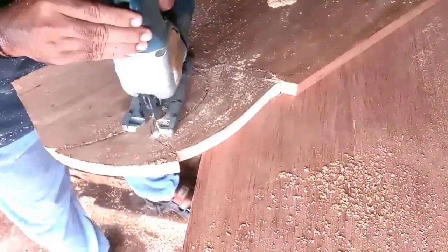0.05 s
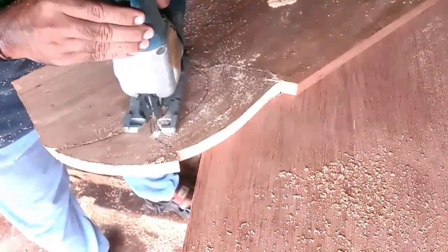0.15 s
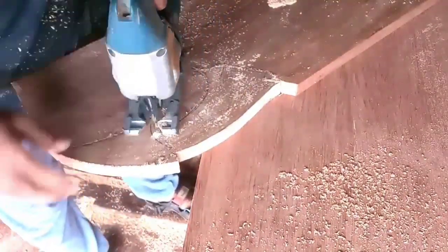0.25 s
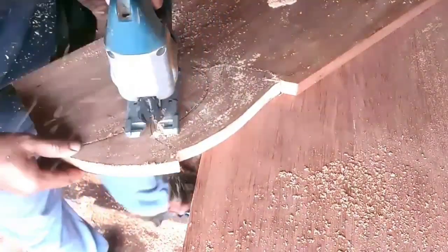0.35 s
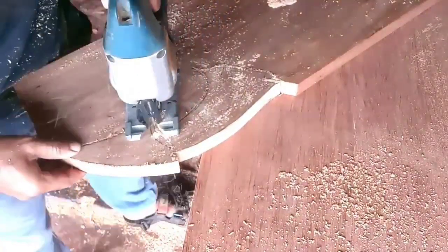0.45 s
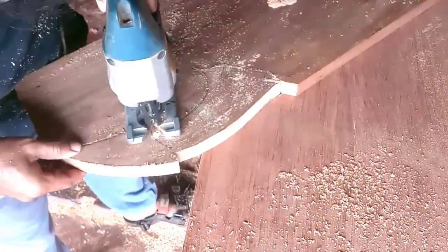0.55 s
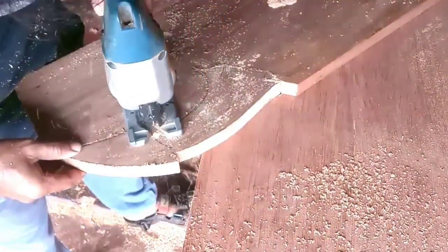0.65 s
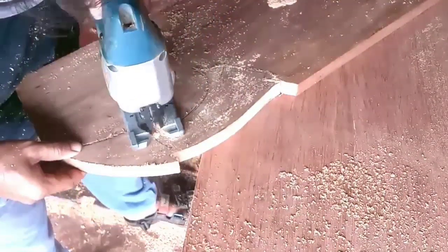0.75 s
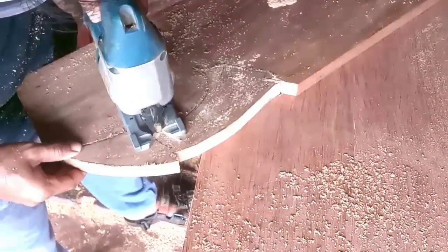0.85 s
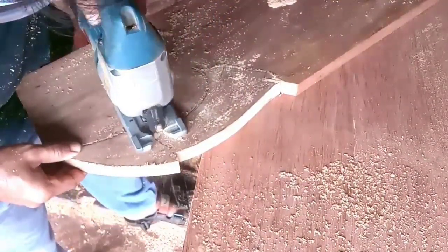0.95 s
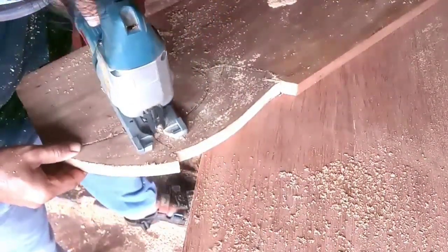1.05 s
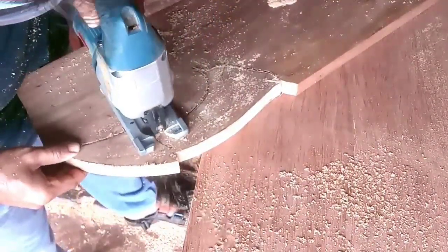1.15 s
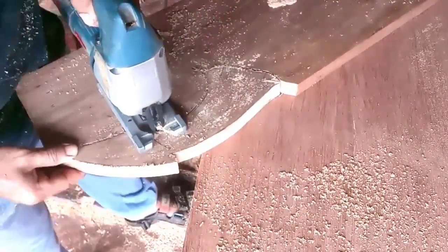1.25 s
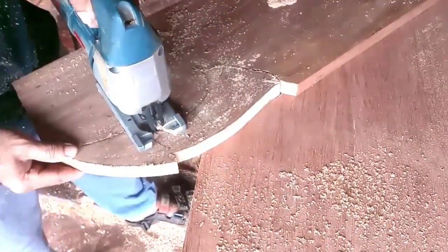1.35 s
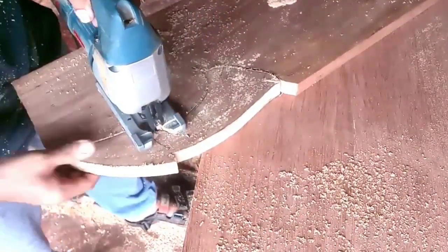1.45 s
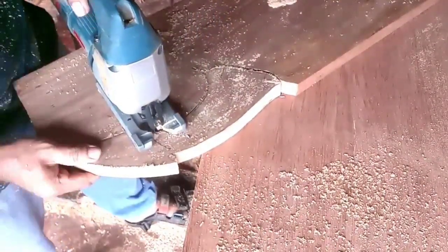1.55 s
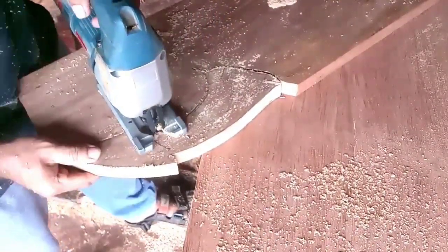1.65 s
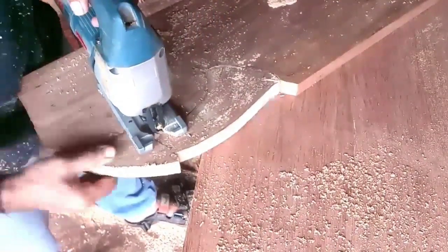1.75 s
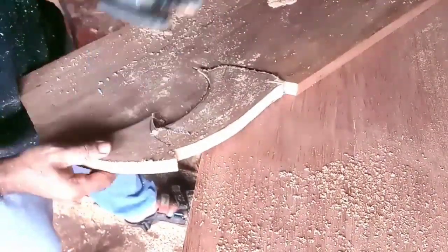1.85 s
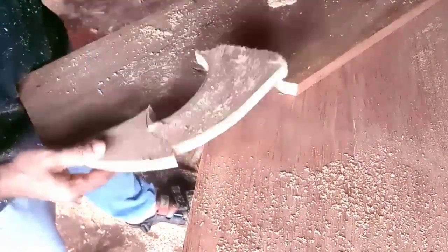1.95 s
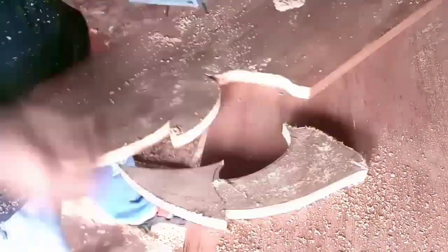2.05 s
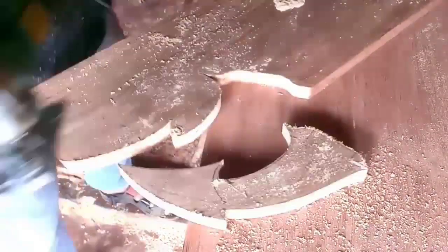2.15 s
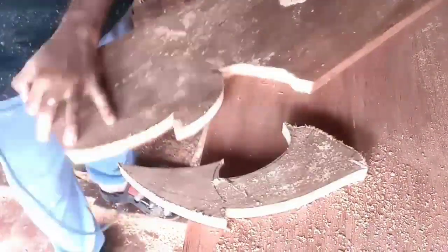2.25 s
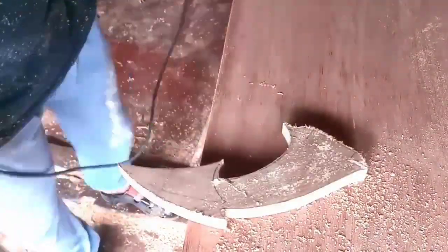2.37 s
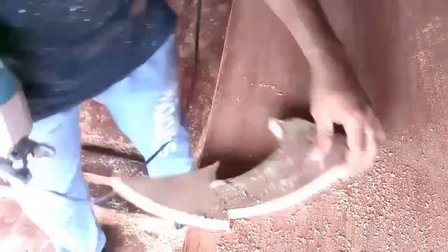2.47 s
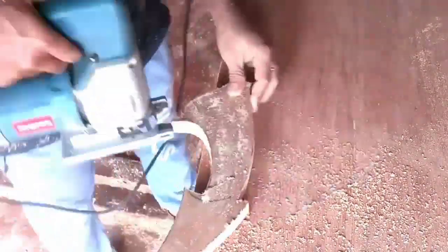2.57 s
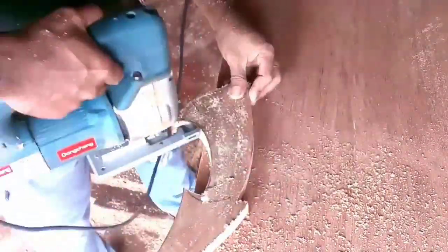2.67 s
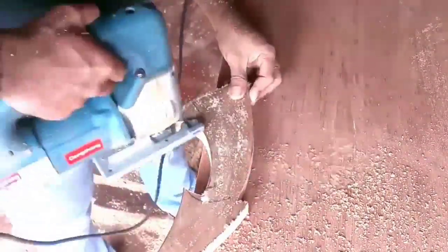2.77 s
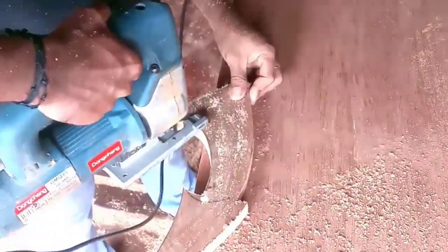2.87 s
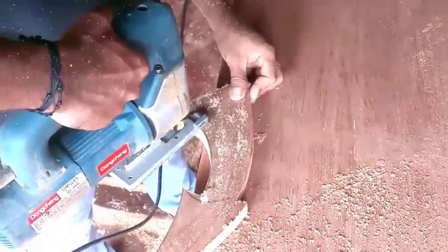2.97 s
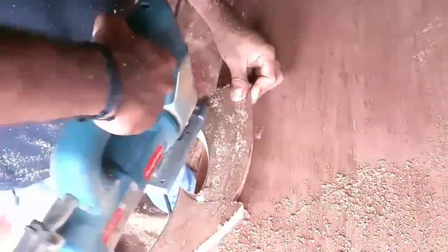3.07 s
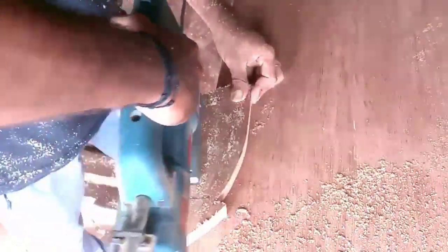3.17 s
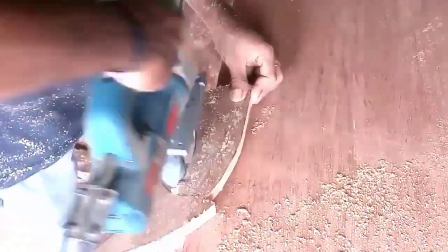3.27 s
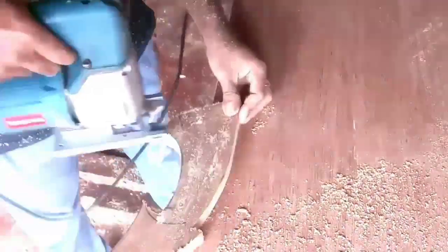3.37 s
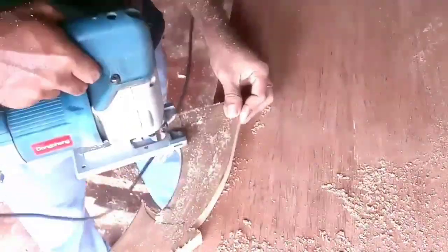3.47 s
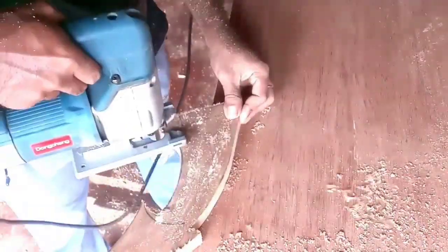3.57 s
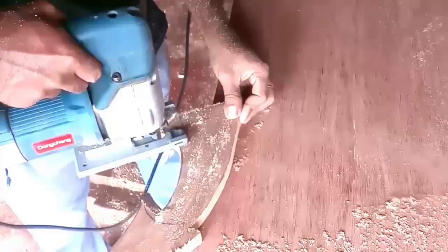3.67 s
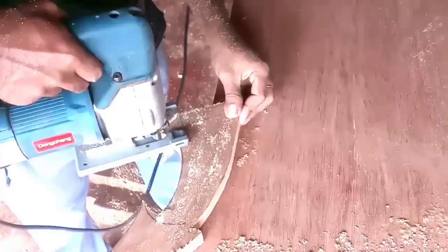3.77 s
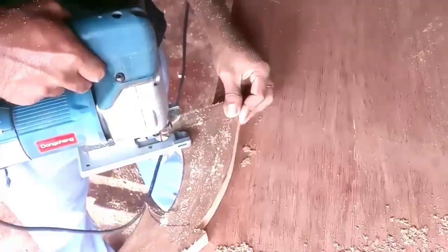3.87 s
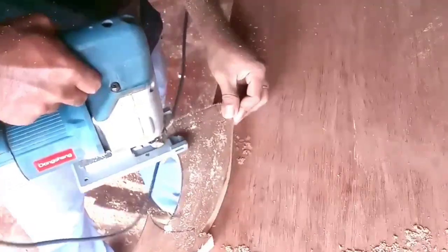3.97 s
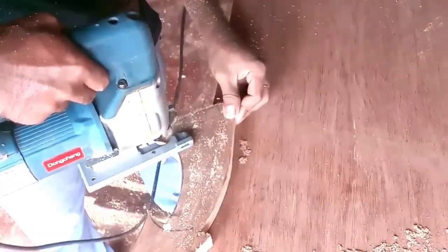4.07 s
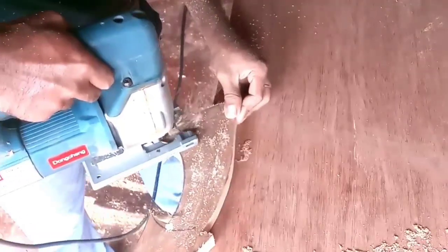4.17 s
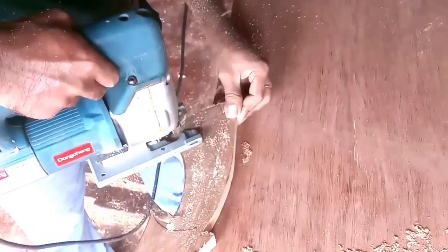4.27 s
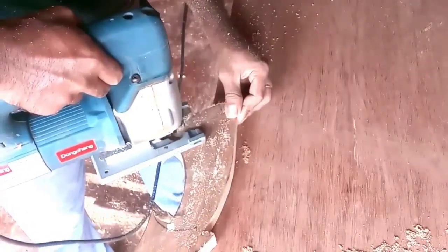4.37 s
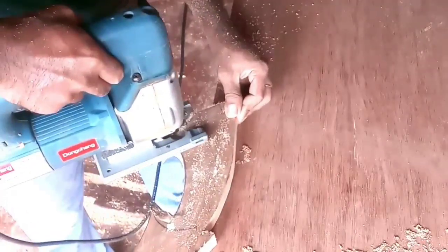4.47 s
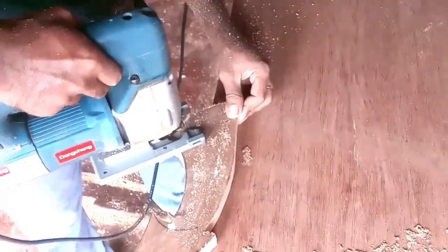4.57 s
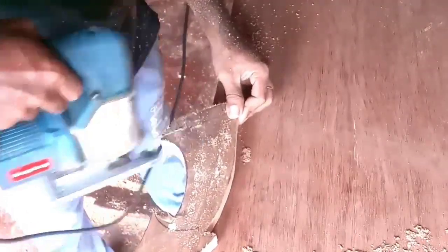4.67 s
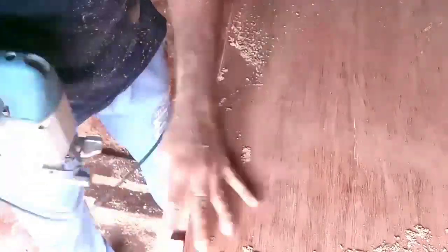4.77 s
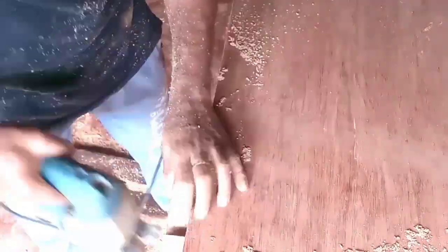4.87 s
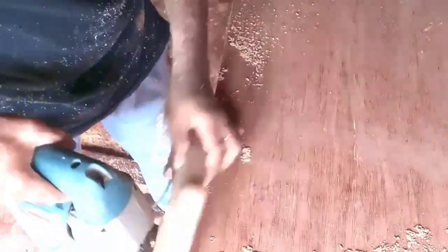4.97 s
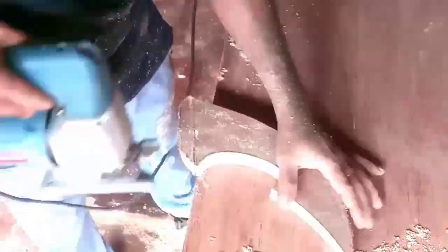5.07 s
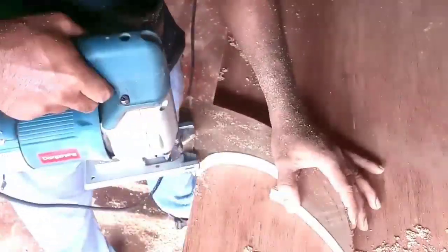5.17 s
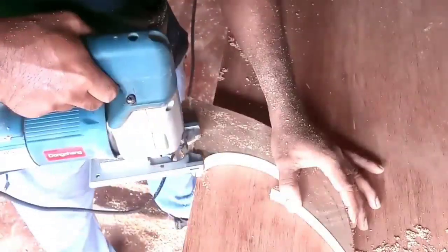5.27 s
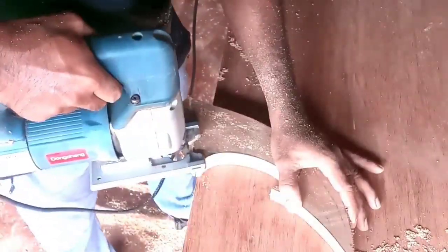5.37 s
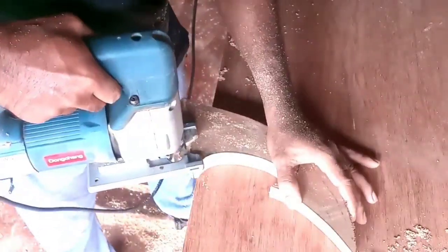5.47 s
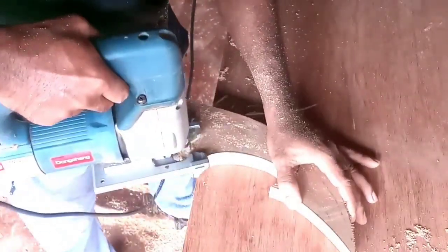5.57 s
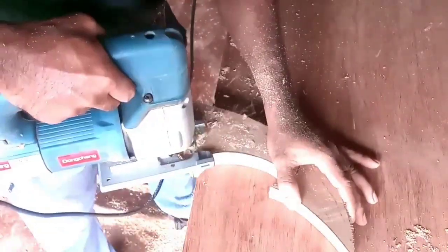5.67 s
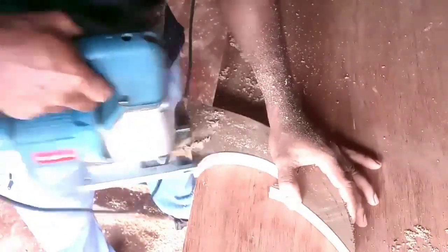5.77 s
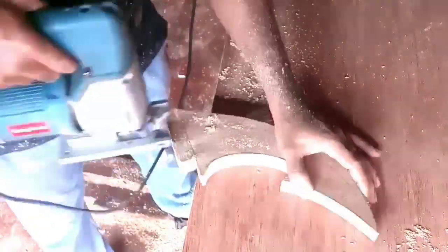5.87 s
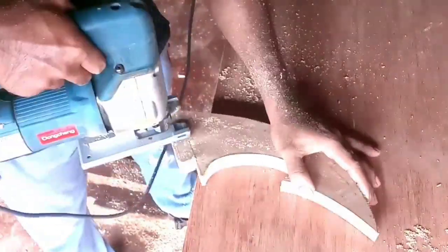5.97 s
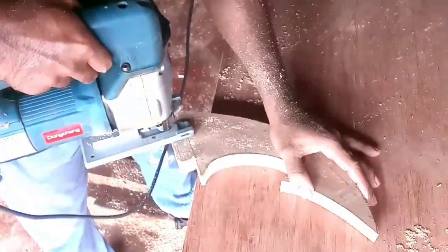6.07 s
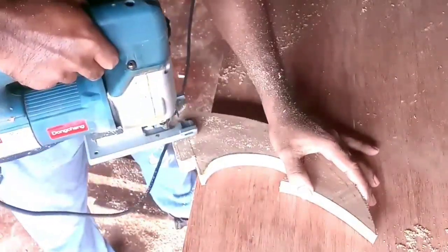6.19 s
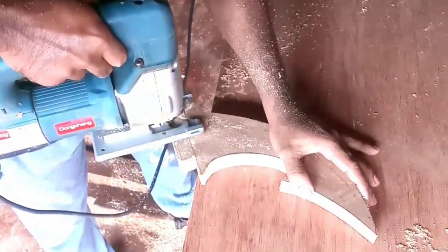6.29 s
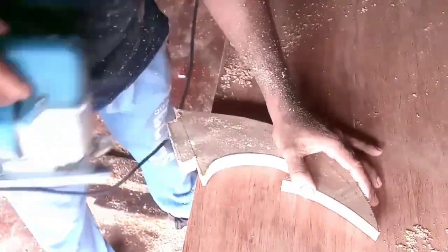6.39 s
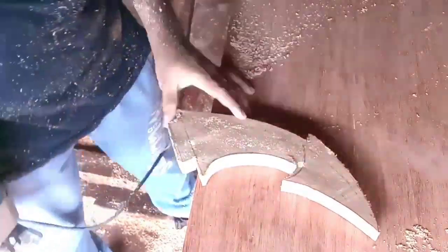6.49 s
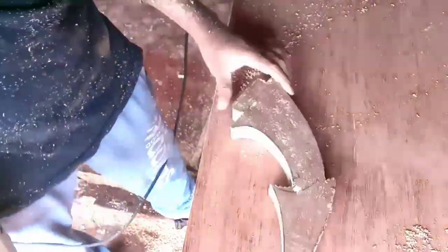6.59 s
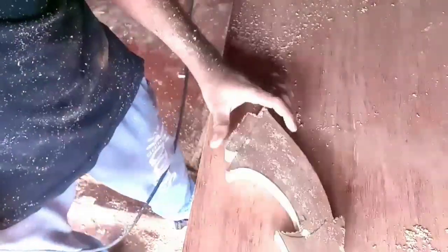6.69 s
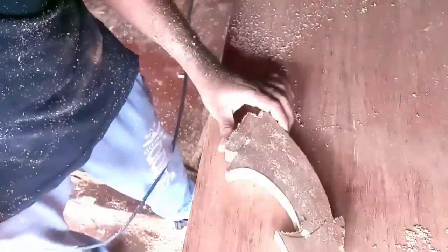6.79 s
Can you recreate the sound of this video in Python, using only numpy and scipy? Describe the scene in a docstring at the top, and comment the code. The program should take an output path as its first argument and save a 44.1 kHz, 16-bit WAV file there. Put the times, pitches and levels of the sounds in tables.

```python
"""Jigsaw in time lapse

A hand-held jigsaw cuts a board in several runs: gritty bursts, one per stroke, drive resonances of the saw
and the wood. Short snatches are cross-faded, so the strokes lose their beat and the whirr turns grainy.
Loose parts rattle, the board hums as a drifting resonance, and the bench rumbles as deep filtered noise.
Mostly in the pause, the offcut knocks as decaying modes, is dragged, and a hand sweeps dust as ticking hiss.
"""
import sys
import numpy as np
from scipy import signal
from scipy.fft import rfft, irfft
from scipy.io import wavfile
from scipy.ndimage import uniform_filter1d

SR = 44100
rng = np.random.default_rng(int(sys.argv[2]) if len(sys.argv) > 2 else 0)


def to_wav(sig):
    """Store sig (one row per channel, or 1-D mono) as 16-bit WAV at the path in sys.argv[1].

    Samples outside -1..1 are clipped; the rate is SR.
    """
    pcm = np.clip(np.atleast_2d(sig), -1, 1) * 32767
    pcm = np.round(pcm).astype(np.int16)
    wavfile.write(sys.argv[1], SR, pcm.T)  # frames by channels


N = 301203

# Trigger squeezes: (press [s], run-up [s], release [s], run-down [s], base whirr level [dB])
TRIGGER_SQUEEZES = [(-0.1, .02, 1.3, .56, -34.2), (2.752, .01, 2.77, .3, -57), (2.78, .02, 2.817, .42, -33),
                    (2.89, .12, 3.39, .75, -34.5), (3.5, .2, 4.8, .62, -34.8),
                    (5.3, .022, 5.86, .62, -34.8), (6.08, .03, 6.48, .6, -34.6)]
# Coasting motor: (share of run-down [0-1], level change [dB])
RUN_DOWN_CURVE = [(0, 0), (.3, -5), (.55, -9), (.65, -12.5), (.8, -22), (1, -40)]
# Slow strokes heard singly: (time [s], swell [dB])
COASTING_STROKES = [(1.447, 2.5), (1.5, 3), (1.558, 4), (1.604, 3), (1.644, 7), (1.68, 3), (1.729, 4.5),
                    (1.772, 5.5), (1.8, 6), (5.11, 5.5), (5.137, 4.5), (5.165, 0), (5.185, 3.5), (5.22, 5),
                    (5.252, 4), (5.3, 7), (6.744, 4), (6.764, 5)]
# Colour as the saw is turned and pressed: (time [s], added whirr [dB], then relative to whirr:
# low shell ring [dB], high shell ring [dB], tooth bite [dB], wood drone [dB])
GRIP_COLOUR = [(0, .1, -4.5, -2.5, -4.5, -8), (.45, -.1, -3.5, -1, -3, -8), (.9, -.1, -5, -2.5, -4, -7.5),
               (1.3, .1, -7, -6.5, -4.5, -9), (1.6, .2, -7, -6, -4.5, -9), (1.72, -.1, -6, -2.5, -.5, -.6),
               (2.77, .1, -1, -5, 9, 4), (2.805, .1, -2, -5, -3.5, -9), (2.93, -.1, .3, -2.5, -.2, -4.5),
               (3.05, .1, -3.5, -.3, -1.5, -8.5), (3.22, -.1, -.3, -4.2, -.1, -8.6),
               (3.39, .1, -1, -2.5, .2, -10), (3.55, -.1, .3, -2.5, -4, -7), (3.8, .1, .9, -2.8, -5, -7.5),
               (4.4, -.1, .1, -2.3, -3, -7), (4.75, .1, -.3, -2, -3, -9), (4.88, -.8, 2, -.8, -7.5, -9),
               (5.0, -4, -1, -1.5, -3.5, -10), (5.12, .5, -4, -7, -7, -8.5), (5.27, 2.4, -.5, .8, -2, -1.2),
               (5.34, .1, .1, -2.5, -4.2, -7), (5.75, -.1, .7, .2, -4.8, -7.6),
               (5.97, .3, -1, -2.5, -5, -10), (6.1, .1, -1, -2.5, -4.5, -7),
               (6.45, .1, -.5, -2, -3.5, -7.5), (6.6, -2.4, -.5, -.5, -3, -9),
               (6.72, -3.2, -4, -2.5, -4.5, -9), (6.8, 1.2, -4.5, -3, -4.5, -7)]
# Fan and gear spectrum: (frequency [Hz], gain [dB])
WHIRR_SPECTRUM = [(2300, -75), (3600, -13), (4000, -0.5), (4500, 3), (5900, 0.9), (6500, 3), (6900, -0.2),
                  (8200, 1.5), (8600, -2.5), (9600, -14), (10200, -12), (14700, -15), (15300, -13.5),
                  (15600, -18)]
# Shell modes, lower group: (frequency [Hz], width [Hz], level [dB])
SHELL_LOW_MODES = [(2870, 540, -4), (3155, 410, -0.5)]
# Shell modes, upper group: (frequency [Hz], width [Hz], level [dB])
SHELL_HIGH_MODES = [(3497, 410, 0.5), (3920, 850, -6)]
# Tooth bite spectrum: (frequency [Hz], gain [dB])
BITE_SPECTRUM = [(900, -15), (1400, -14.5), (1900, -9), (2400, -7.5), (2900, -13.5), (4500, -19.5)]
# Wood drone spectrum: (frequency [Hz], gain [dB])
DRONE_SPECTRUM = [(280, -19), (480, -3), (633, -4), (706, 1.5), (847, -1.5), (981, 1.5), (1220, -2.5),
                  (1500, -3.5), (1950, -20), (3300, -120)]
# Single rattles of blade and gears: (time [s], peak before input stage [dB], pitch [Hz])
RATTLE_EVENTS = [(0.6922, -21, 3660), (1.4184, -26, 5630), (1.444, -26, 4420), (1.477, -24.5, 5440),
                 (1.5114, -25, 4930), (1.638, -30, 2963), (1.724, -36.5, 3190), (1.7648, -42, 4280),
                 (1.8367, -46, 7000), (2.758, -36.5, 8300), (2.973, -22, 3500), (3.0314, -24, 3440),
                 (3.1254, -18, 3200), (3.3563, -23, 3100), (3.684, -23, 3470), (3.736, -21, 3130),
                 (3.7862, -20, 3030), (4.0022, -20, 3100), (4.3325, -22, 3040), (4.9336, -25, 3300),
                 (5.0885, -29, 3180), (5.1097, -28, 2790), (5.213, -26, 3180), (5.2949, -31, 3070),
                 (5.328, -24, 3400), (5.344, -18, 3200), (5.698, -20, 3250), (5.831, -19, 3320),
                 (5.9024, -20, 3270), (6.5386, -21, 3520), (6.789, -28, 6650)]
# Board hums under blade or hand: (start [s], end [s], first level [dB], last level [dB], nominal centre [Hz])
BOARD_HUMS = [(-0.05, 1.35, -52.5, -54, 275), (1.4, 1.75, -64, -63, 205), (1.9, 2.12, -52.5, -56, 220),
              (2.16, 2.32, -52, -46, 185), (2.4, 2.8, -60, -59, 215), (2.88, 3.36, -58, -47, 272),
              (3.58, 4.08, -50.5, -47.5, 265), (4.12, 4.2, -48, -45, 183), (4.24, 4.76, -45.5, -46.5, 265),
              (5.34, 5.85, -47.5, -48, 298), (6.08, 6.44, -47.5, -42, 291), (6.77, 6.897, -58, -63, 240)]
# Offcut blows: (time [s], ring peak [dB], sharpness [dB per octave])
KNOCK_EVENTS = [(1.841, -43, -4), (1.934, -39, -5), (2.0026, -23, -0.7), (2.1122, -25.5, -5.5),
                (2.1215, -35, -3), (4.016, -27, 0.5), (5.136, -31.5, -5.5), (6.762, -43, -8)]
# Offcut modes: (frequency [Hz], level [dB], t60 [s])
OFFCUT_MODES = [(145, 5, 0.027), (328, 2, 0.03), (463, -5, 0.06), (592, -7, 0.047), (814, 0.5, 0.026),
                (1230, -3, 0.017), (1560, -10, .015), (2120, -1.5, 0.0094), (2850, -13, 0.011),
                (3600, -19, .01)]
# Wood and hand on the dusty bench: (time [s], level [dB], added treble gain [dB])
SLIDE_LEVELS = [(1.75, -57.5, 0), (1.85, -58.5, -4), (2.1, -56.5, -1.5), (2.18, -53.5, -1.5),
                (2.376, -54.5, -2.5), (2.43, -44.5, -0.5), (2.472, -52, 2), (2.488, -58, -2.5),
                (2.57, -60, -4), (2.585, -58, 3), (2.63, -57.5, -3), (2.742, -55, -8), (2.8, -56, 5)]
# Sliding spectrum: (frequency [Hz], gain [dB])
SLIDE_SPECTRUM = [(210, -27), (350, -1), (554, -2.5), (629, -13), (681, -1), (877, -8.5), (1010, -4),
                  (1880, -11), (2000, -9.5), (3320, -15), (4420, -18), (5690, -22.5), (7690, -20),
                  (9450, -38.5), (15400, -38)]
# Offcut scraping along the bench: (time [s], level [dB])
DRAG_LEVELS = [(2.14, -71), (2.222, -53), (2.242, -61), (2.256, -58), (2.304, -54), (2.384, -58),
               (2.4, -60)]
# Upper modes of the dragged offcut: (frequency [Hz], width [Hz], level [dB])
DRAG_MODES = [(1240, 330, 5), (2600, 300, -3), (3860, 400, -15)]
# Deep bench rumble: (time [s], level [dB])
BENCH_LEVELS = [(0.0, -55), (0.89, -56), (1.03, -62), (1.67, -59), (2.2, -52), (2.6, -55), (2.8, -57),
                (3.0, -63), (3.61, -63.5), (3.76, -58), (4.13, -64), (4.43, -60), (4.64, -78), (5.08, -71),
                (5.2, -68), (5.33, -61), (5.67, -70), (5.86, -61), (6.2, -64), (6.31, -58), (6.45, -74),
                (6.83, -73)]
# Bench spectrum: (frequency [Hz], gain [dB])
BENCH_SPECTRUM = [(12, -45), (25, -26), (50, -11), (90, -7), (150, -7), (210, -7.5), (350, -70)]

STROKES_PER_S, SWELL_HALF_S = 48, 0.0049
RUN_UP_POWER = 1.44  # sound pressure grows as this power of motor speed
# RMS chance waver of the GRIP_COLOUR level columns
GRIP_WAVER_DB, GRIP_CHANGES_PER_S = [.25, .7, .7, .6, .6], 12
SNATCH_SAMPLES = 256  # splice to splice
RATTLE_T60_S, CLATTER_RATIO = 0.014, .4  # clatter relative to the pitched part
HUM_RISE_DB_PER_S, HUM_FALL_DB_PER_S, HUM_REST_DB = 500, 400, -70.5
HUM_LUMPS_DB, HUM_DRIFT_RATIO, HUM_CHANGES_PER_S = 1.1, .08, 20
BAND_EDGE_HZ = 15520


def saw():
    """A gritty drive, a burst at each stroke, shakes fan and gears, shell, teeth and wood."""
    stroke_phase = np.arange(N) * STROKES_PER_S / SR % 1
    tick_shares = [[.12], [.3], [.3], [.15], [.08]]  # the shell takes the ticks most directly
    drives = grit(per_s=350, spread_db=2.0, share=tick_shares, count=5)
    drives = drives * (2.3 + np.exp(-stroke_phase / 0.29))
    bodies = [response(WHIRR_SPECTRUM), ringing(SHELL_LOW_MODES), ringing(SHELL_HIGH_MODES),
              response(BITE_SPECTRUM), response(DRONE_SPECTRUM)]
    layers = [coloured(drive, body) for drive, body in zip(drives, bodies)]
    whirr, *others = snatches(layers, ripple_db=1.5)
    flutter_db = 0.66 * wander(per_s=70)  # the load on the motor wavers
    whirr_db, *above_db = motor()
    t = np.arange(N) / SR
    swell_db = sum(db * np.exp(-((t - s) / SWELL_HALF_S) ** 2) for s, db in COASTING_STROKES)
    added = sum(amp(db) * layer for db, layer in zip(above_db, others))
    return amp(whirr_db + swell_db) * (amp(flutter_db) * whirr + added)


def motor():
    """The motor runs up at a press and coasts after release; the grip colours the sound."""
    t = np.arange(N) / SR
    runs_db = []
    for press, run_up, release, run_down, whirr_db in TRIGGER_SQUEEZES:
        speed = np.clip((t - press) / run_up, 1e-3, 1)
        coast_db = np.interp((t - release) / run_down, *np.transpose(RUN_DOWN_CURVE), right=-60)
        runs_db.append(whirr_db + 20 * RUN_UP_POWER * np.log10(speed) + coast_db)
    level_db = np.max(runs_db, axis=0)
    s, *columns = np.transpose(GRIP_COLOUR)
    added_db, *above_db = [np.interp(t, s, db) + waver_db * wander(GRIP_CHANGES_PER_S)
                           for db, waver_db in zip(columns, GRIP_WAVER_DB)]
    return [level_db + added_db] + above_db


def rattles():
    """A short noise puff rings one loose part and the rest of the saw."""
    out, t, whirr = np.zeros(N), np.arange(1500) / SR, response(WHIRR_SPECTRUM)
    noises = rng.standard_normal((len(RATTLE_EVENTS), 1500))
    for (s, db, hz), noise in zip(RATTLE_EVENTS, noises):
        puff = noise * amp(-60 * t / RATTLE_T60_S) * (1 - np.exp(-t / 0.00042))
        part_ring = np.exp(-np.pi * 500 * t[:300]) * np.sin(2 * np.pi * hz * t[:300])
        part = evened(no_bass(np.convolve(puff, part_ring)[:1500], hz=1500))
        clatter = evened(np.convolve(puff, whirr[:300])[:1500])
        rattle = part + CLATTER_RATIO * clatter
        add(out, s, amp(db) * rattle / abs(rattle).max())
    return out


def board():
    """A broad resonance drifts as hand and saw move over the wood."""
    t = np.arange(N) / SR
    start, end, first_db, last_db, centre_hz = np.transpose(BOARD_HUMS)[:, :, None]
    held_db = first_db + (last_db - first_db) * np.clip((t - start) / (end - start), 0, 1)
    rise_db = HUM_RISE_DB_PER_S * np.maximum(start - t, 0)
    fall_db = HUM_FALL_DB_PER_S * np.maximum(t - end, 0)
    each_db = held_db - rise_db - fall_db
    level_db = np.maximum(each_db.max(axis=0), HUM_REST_DB) + HUM_LUMPS_DB * wander(HUM_CHANGES_PER_S)
    # The loudest hum sets the centre
    hz = uniform_filter1d(centre_hz[each_db.argmax(axis=0), 0], size=1500)
    hz = hz * (1 + HUM_DRIFT_RATIO * wander(HUM_CHANGES_PER_S))
    carrier = np.exp(2j * np.pi * np.cumsum(hz) / SR)
    pole = np.exp(-np.pi * 170 / SR)
    # Shift the centre to 0 Hz, low-pass twice, shift back
    hum = grit(per_s=68, spread_db=4., share=0.38)[0] / carrier
    for _ in range(2):
        hum = signal.lfilter([1 - pole], [1, -pole], hum)
    return amp(level_db) * evened((hum * carrier).real)


def knocks():
    """Each blow rings the offcut's modes and chatters; a softer blow excites less of the high ones."""
    out, t = np.zeros(N), np.arange(4000) / SR
    noises = rng.standard_normal((len(KNOCK_EVENTS), 4000))
    for (s, db, sharp), noise in zip(KNOCK_EVENTS, noises):
        ring = np.zeros(4000)
        for k, (hz, mode_db, t60) in enumerate(OFFCUT_MODES):
            decay = amp(mode_db + sharp * np.log2(hz / 300) - 60 * t / t60)
            build_up = 1 - np.exp(-1.3 * hz * t)  # about a cycle
            ring += (-1) ** (k + 1) * decay * build_up * np.sin(2 * np.pi * hz * t)
        chatter = np.convolve(noise * amp(-60 * t / 0.037), ring)[:4000]  # the piece rocks before it settles
        add(out, s, amp(db) * (ring / abs(ring).max() + 0.25 * chatter / abs(chatter).max()))
    return out


def slide():
    """Dust grains crunch under wood and hand, as ticks in hiss with a moving treble level."""
    level_db, treble_db = curves(SLIDE_LEVELS)
    grains = grit(per_s=680, spread_db=6.0, share=0.11)[0]
    rub = snatches([coloured(grains, response(SLIDE_SPECTRUM))], ripple_db=2.0)[0]
    low = signal.sosfiltfilt(signal.butter(2, 2600, fs=SR, output="sos"), rub)
    return amp(level_db) * (evened(low) + amp(treble_db) * evened(rub - low))


def drag():
    """Grains under the dragged offcut ring its upper modes."""
    grains = grit(per_s=340, spread_db=1.0, share=.5)[0]
    return amp(curves(DRAG_LEVELS)[0]) * coloured(grains, ringing(DRAG_MODES))


def bench():
    """Deep shaking of the bench: filtered noise."""
    rumble = coloured(rng.standard_normal(N), response(BENCH_SPECTRUM))
    return amp(curves(BENCH_LEVELS)[0]) * rumble


def snatches(layers, ripple_db, ripple_bins=3, first_s=0.0038):
    """Time lapse: pieces from unrelated moments, each of chance colour, joined by straight cross-fades."""
    count = N // SNATCH_SAMPLES + 3
    start = rng.integers(0, N - 2 * SNATCH_SAMPLES, count)
    ripple = rng.standard_normal((count, SNATCH_SAMPLES + 1))
    ripple = evened(uniform_filter1d(ripple, int(ripple_bins), axis=1))
    pieces = np.array(layers)[:, start[:, None] + np.arange(2 * SNATCH_SAMPLES)]
    pieces = irfft(rfft(pieces) * amp(ripple_db * ripple)) * signal.windows.triang(2 * SNATCH_SAMPLES)
    joined = pieces[:, 1:, :SNATCH_SAMPLES] + pieces[:, :-1, SNATCH_SAMPLES:]
    skip = SNATCH_SAMPLES - int(first_s * SR)
    return [evened(x.ravel()[skip:skip + N]) for x in joined]


def grit(per_s, spread_db, share, count=1):
    """Hiss mixed with sparse uneven ticks; rows tick together but hiss apart."""
    tick_sizes = amp(spread_db * np.minimum(rng.exponential(1, N), 3))
    ticks = tick_sizes * (rng.random(N) < per_s / SR)
    share = np.clip(share, 0, 1)  # of power
    hiss = rng.standard_normal((count, N))
    signed_ticks = evened(ticks * rng.choice([-1., 1.], (count, N)))
    return np.sqrt(1 - share) * hiss + np.sqrt(share) * signed_ticks


def wander(per_s):
    """Slow chance curve of unit RMS."""
    slow = signal.resample(rng.standard_normal(int(per_s * N / SR)), N // 32)
    return evened(np.interp(np.arange(N) / 32, np.arange(len(slow)), slow))


def response(points, size=4096):
    """Causal, minimum-phase impulse response with the given spectrum."""
    f, db = np.transpose(points)
    hz = abs(np.fft.fftfreq(size, 1 / SR))
    log_gain = np.log(amp(np.interp(np.log(hz + 1), np.log(f + 1), db, -90, -90)))
    return np.fft.ifft(np.exp(np.conj(signal.hilbert(log_gain)))).real[:size // 2]


def ringing(modes):
    """Impulse response of a small body: steep resonances whose powers add."""
    hz = np.linspace(100, 15000, 600)
    power = sum(amp(2 * db) / (1 + (2 * (hz - f) / width) ** 2) ** 2 for f, width, db in modes)
    return response(np.transpose([hz, 10 * np.log10(power)]))


def coloured(x, taps):
    """Filtered signal at unit RMS."""
    return evened(signal.oaconvolve(x, taps)[:N])


def no_bass(x, hz):
    """Third-order high-pass."""
    return signal.sosfilt(signal.butter(3, hz, "high", fs=SR, output="sos"), x)


def curves(rows):
    """Table columns at every sample; the first, a level, drops to -120 dB outside the table."""
    s, level_db, *others = np.transpose(rows)
    t = np.arange(N) / SR
    return [np.interp(t, s, level_db, -120, -120)] + [np.interp(t, s, c) for c in others]


def add(mix, s, sound):
    """Adds a sound in place at a time, cut at the end of the mix."""
    part = mix[round(s * SR):][:len(sound)]
    part += sound[:len(part)]


def amp(db):
    """Amplitude ratio from dB."""
    return 10 ** (np.asarray(db) / 20)


def evened(x):
    """Scales to unit RMS."""
    return x / np.sqrt(np.mean(x ** 2) + 1e-20)


def scene():
    """Sums all sources into one channel."""
    return (saw() + rattles() + board() + bench() + slide() + drag() + knocks())[None]


def record(dry):
    """The input stage rounds off the highest peaks; then the band limit."""
    soft = .2 * np.tanh(dry / .2)
    low_pass = signal.firwin(2047, BAND_EDGE_HZ, window=("kaiser", 7), fs=SR)
    return signal.oaconvolve(soft, low_pass[None], "same")


dry = scene()
out = record(dry)
to_wav(out)
```